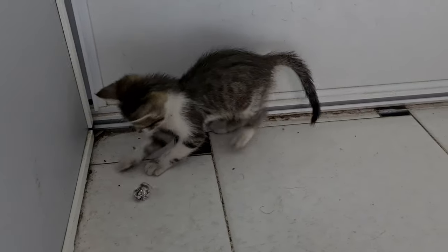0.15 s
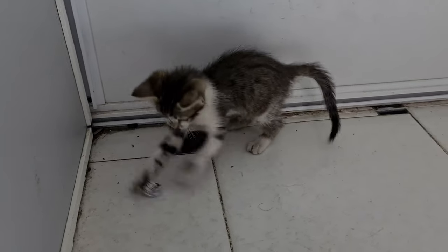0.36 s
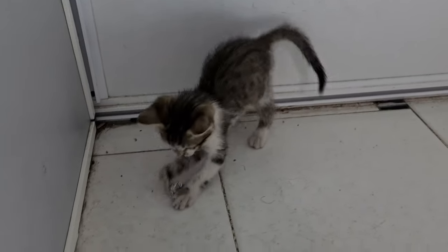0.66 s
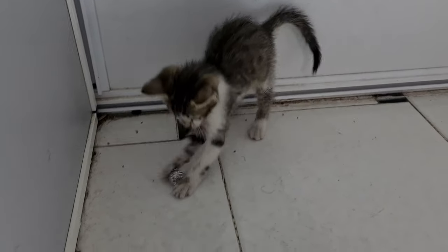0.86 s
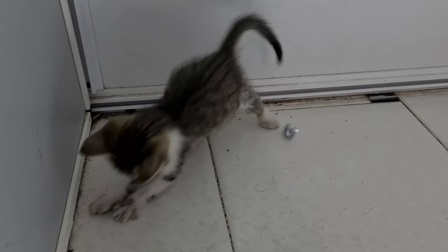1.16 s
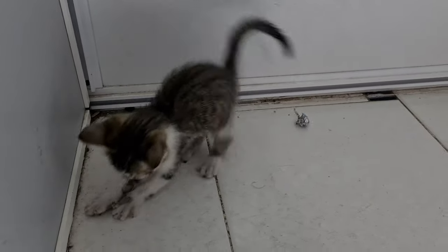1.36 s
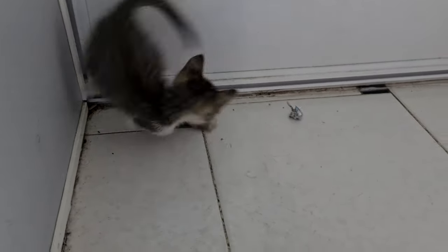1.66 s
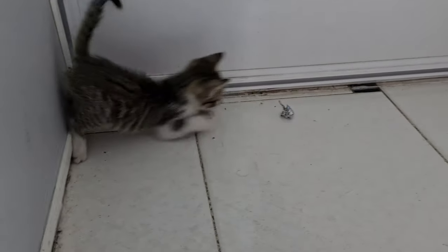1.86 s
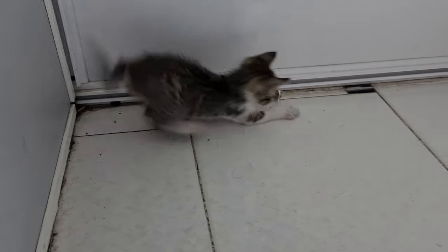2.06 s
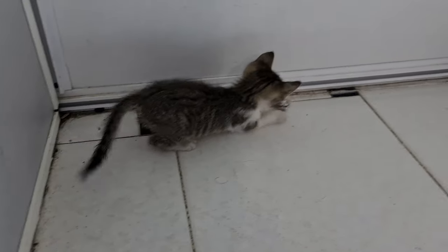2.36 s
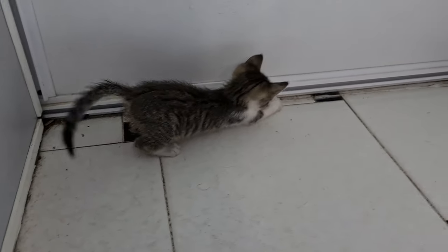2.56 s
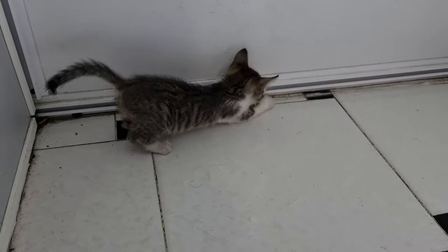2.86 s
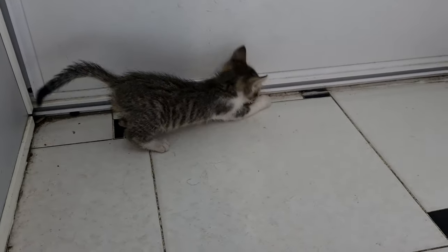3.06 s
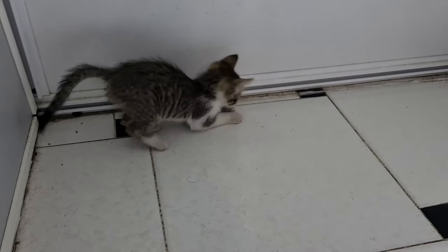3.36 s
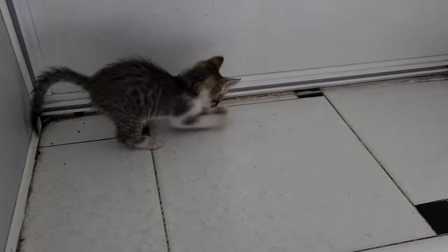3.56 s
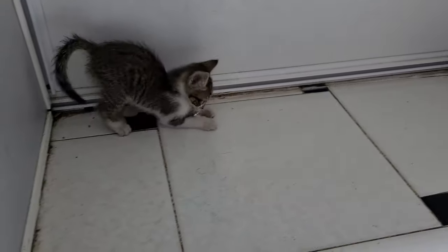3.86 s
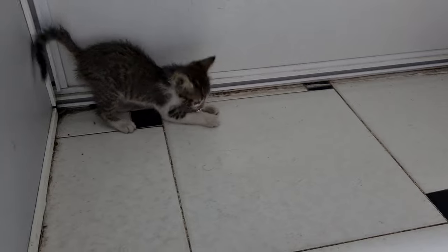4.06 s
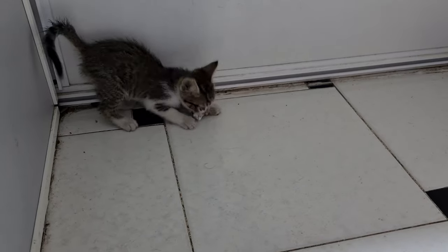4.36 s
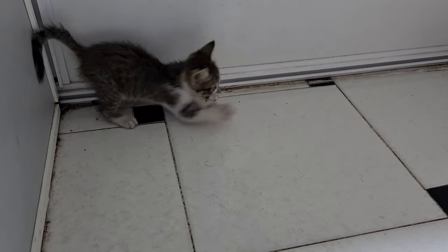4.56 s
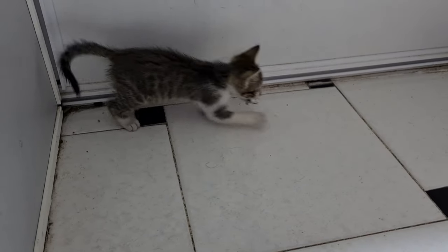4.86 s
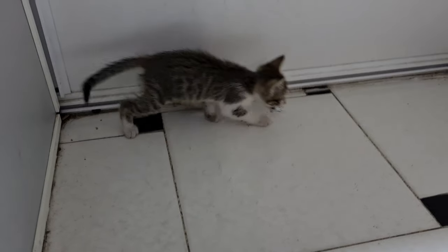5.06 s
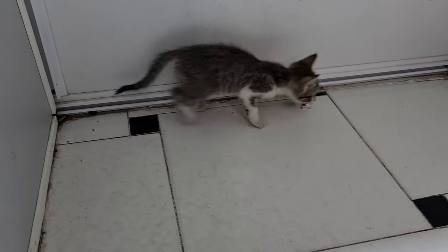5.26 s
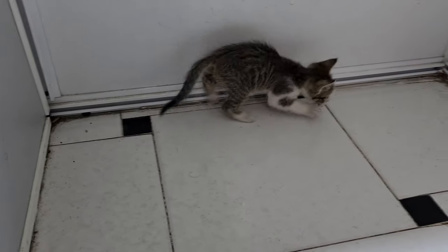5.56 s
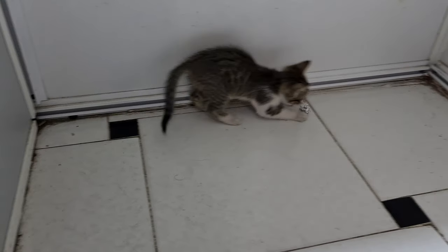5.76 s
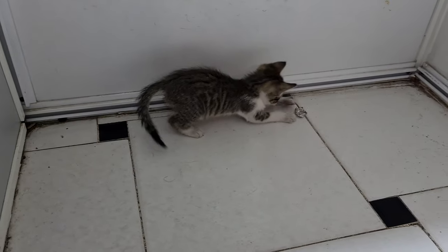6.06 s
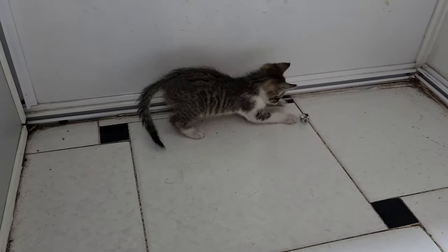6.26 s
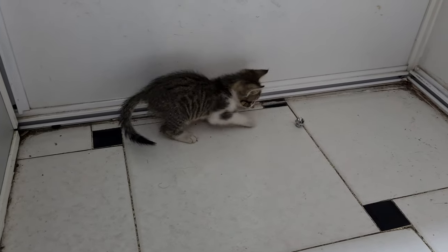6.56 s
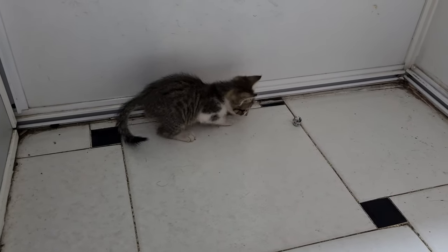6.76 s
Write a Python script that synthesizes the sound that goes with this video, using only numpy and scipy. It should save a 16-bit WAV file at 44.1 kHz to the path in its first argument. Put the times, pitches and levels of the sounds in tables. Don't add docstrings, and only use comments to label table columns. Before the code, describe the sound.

In a bare tiled corner, a kitten bats a crumpled foil ball: crisp ticks, crinkles and short scrapes in uneven bursts. Just before two seconds a hollow door is bumped with a quick rebound flutter, then brisk foil scrapes follow. Later come sparser ticks and small bright pings. Low vehicle engines drone and surge outside with tyre wash, gradually fading. Close stereo handheld microphone, short hard-walled echo.

```python
import sys
import numpy as np
from scipy import signal
from scipy.fft import rfft, irfft
from scipy.io import wavfile
from scipy.ndimage import uniform_filter1d

SR = 44100
rng = np.random.default_rng(int(sys.argv[2]) if len(sys.argv) > 2 else 0)


def log_audio(samples):
    frames = np.atleast_2d(samples).T
    limited = np.clip(frames, -1, 1)
    pcm = np.round(limited * 32767).astype(np.int16)
    wavfile.write(sys.argv[1], SR, pcm)


def volts_from_decibels(level):
    exponent = np.asarray(level, float) / 20
    return 10 ** exponent


N = 304712

# (frequency [Hz], likeness [-1 to 1])
LIKENESS = [(60, 0.98), (180, 0.94), (550, 0.62), (1650, -0.22), (4970, 0.13), (15000, 0.096)]


def evened(x):
    return x / np.sqrt(np.mean(x ** 2) + 1e-20)


def read(points, hz):
    f, value = np.transpose(points)
    return np.interp(np.log(hz + 1), np.log(f + 1), value)


def add(mix, s, sound):
    part = mix[..., round(s * SR):][..., :sound.shape[-1]]
    part += sound[..., :part.shape[-1]]


def unroll(rows):
    s, *columns = np.transpose(rows)
    t = np.arange(s[0], s[-1], 1 / SR)
    return [t] + [np.interp(t, s, c) for c in columns]


def resonate(x, hz, width):
    turn = np.exp(2j * np.pi * np.cumsum(hz * np.ones(x.shape[-1])) / SR)
    r = np.exp(-np.pi * width / SR)
    return 2 * (turn * signal.lfilter([1 - r], [1, -r], x / turn)).real


def crackle(size, spread_db):
    strength = np.minimum(rng.exponential(1, size // 24 + 1), 4.2)
    clumps = volts_from_decibels(spread_db * np.repeat(strength, 24)[:size])
    return evened(rng.standard_normal((2, size)) * uniform_filter1d(clumps, 12))


def road():
    # (time [s], level [dB])
    wash = [
        (0.0, -52.5),
        (1.67, -51),
        (2.25, -47.5),
        (3.04, -53),
        (4.389, -58),
        (5.75, -58.5),
        (6.331, -61),
        (6.91, -61.5),
    ]
    # (frequency [Hz], level per Hz [dB])
    near_colour = [(15, -47.5), (30, -28), (60, -6), (105, -10.5), (190, -28), (255, -18.5), (330, -29.5),
                   (550, -31.5), (850, -37), (1020, -33.5), (2050, -36.5), (2500, -47.5), (7000, -65),
                   (16000, -87.5)]
    # (frequency [Hz], level per Hz [dB])
    far_colour = [(15, -42), (30, -3.5), (102, -6), (125, -21.5), (195, -17), (416, -25), (520, -26.5),
                  (700, -36), (1290, -31.5), (2050, -40), (2400, -54), (4500, -57), (6500, -65.5),
                  (16000, -73.5)]
    rumble_share = 0.65
    pass_s, pass_db, pass_width_s = 4.25, 6, 0.37

    frames, hz = N // 512 + 5, np.fft.rfftfreq(2048, 1 / SR)
    a, b, c, d, patches = rng.standard_normal((frames, len(hz), 5)).T
    patches = evened(uniform_filter1d(uniform_filter1d(patches, 5, axis=0), 8, axis=1))
    t = np.arange(frames) * 512 / SR
    s, wash_db = np.transpose(wash)
    level_db = np.interp(t, s, wash_db)

    away = np.clip((t - 2.4) / 3.3, 0, 1)
    colour_db = (1 - away) * read(near_colour, hz)[:, None] + away * read(far_colour, hz)[:, None]
    middle = (hz > 350) & (hz < 2500)
    colour_db -= 10 * np.log10((volts_from_decibels(colour_db[middle]) ** 2).sum(0))

    bass = 1 / (1 + (hz[:, None] / 330) ** 4)
    steady = 1 / (1 + (8000 / (hz[:, None] + 1)) ** 4)
    passing_db = pass_db * np.exp(-((t - pass_s) / pass_width_s) ** 2) - 0.98
    swing_db = bass * ((rumble_share - 1) * (level_db - level_db.mean()) + passing_db)
    swing_db -= .4 * steady * (level_db - uniform_filter1d(level_db, 150))

    same = np.clip(read(LIKENESS, hz), -1, 1)[:, None]
    left = a + 1j * b
    right = same * left + np.sqrt(1 - same ** 2) * (c + 1j * d)
    z = np.array([left, right]) * volts_from_decibels(colour_db + level_db + swing_db + 2.08 * patches + 2.0)
    return signal.istft(z, nperseg=2048, noverlap=1536)[1][:, :N]


def drone(t, hz, gain):
    drift, flutter = (evened(uniform_filter1d(uniform_filter1d(v, 2000), 2000))[:len(t)]
                      for v in rng.standard_normal((2, N + SR)))
    tone = np.sqrt(2) * np.sin(2 * np.pi * np.cumsum(hz * (1 + 0.016 * drift)) / SR)
    return gain * volts_from_decibels(2.5 * flutter) * tone * signal.windows.tukey(len(t), .04)


def engines():
    # (time [s], pitch [Hz])
    truck_rate = [(0.0, 39.3), (.48, 45.9), (1.0, 51.08), (1.7, 55.6), (1.8, 53.88), (2.68, 54.2),
                  (2.95, 50.46), (3.54, 38.85), (3.85, 33.7)]
    boom_hz = [(0.0, 93.64), (.67, 89.3), (1.09, 95), (1.9, 98.9), (2.67, 99.4), (3.7, 94.5), (4.1, 88.8),
               (4.5, 96), (6.91, 94.97)]
    car_rate = [(3.8, 84.2), (3.99, 84.23), (4.1, 65.64), (4.89, 74.1), (5.33, 65.37), (5.44, 72.87),
                (6.11, 66.55), (6.57, 80.3), (6.91, 71.4)]
    # (time of top [s], level [dB], rise [s], fall [s])
    truck_swells = [(.31, -42, 0.083, 0.99), (.86, -33, 0.6, 0.058), (1.71, -33, 0.54, 0.034),
                    (1.8, -28.5, 0.028, 0.2), (2.15, -30, 0.062, 0.051), (2.68, -29.5, 0.52, 0.16),
                    (3.54, -29.5, 0.58, 0.37)]
    boom_swells = [(0.0, -20, .1, 0.054), (.3, -41.5, 1.7, 1.8), (1.09, -26, 0.26, 0.13),
                   (1.33, -28.5, .17, 0.96), (2.27, -37, 0.64, 0.22), (2.7, -41.5, 0.53, 1.6),
                   (3.7, -29, 0.21, 0.075), (3.89, -32, 0.23, 0.055), (4.06, -39, 0.18, 0.23),
                   (4.37, -43, 0.22, .2), (4.66, -45, 0.096, 0.28), (5.6, -47, 1.2, 0.17),
                   (6.08, -41, .12, 0.3), (6.72, -45, 0.18, 0.049)]
    car_swells = [(4.1, -36, 0.5, 0.78), (4.35, -38, 0.12, 0.39), (4.86, -38, 1.8, 0.034),
                  (5.44, -38, 0.24, 0.52), (6.11, -47, 0.17, .1), (6.57, -43.5, 0.059, 0.49)]
    # (time [s], firing rate [Hz], level [dB])
    far_engines = [
        [(3.9, 35.2, -47), (4.6, 36.5, -42), (4.78, 49.9, -56), (5.69, 48.6, -56), (5.88, 38, -53),
         (6.91, 37.98, -48)],
        [(5.1, 148.5, -66), (5.482, 144.4, -50), (6.792, 152.2, -64.5), (6.91, 156, -75)],
        [(1.8, 138.8, -41), (2.538, 126.1, -55.5), (2.6, 143, -63)],
    ]
    slope_db = -13.5

    out = np.zeros(N)
    for rows, swells in ((truck_rate, truck_swells), (boom_hz, boom_swells), (car_rate, car_swells)):
        t, hz = unroll(rows)
        power = 0
        for top_s, db, rise, fall in swells:
            distance = np.maximum((top_s - t) / rise, (t - top_s) / fall)
            power = power + volts_from_decibels(db + slope_db * distance) ** 2
        add(out, t[0], drone(t, hz, np.sqrt(power)))
    for rows in far_engines:
        t, hz, db = unroll(rows)
        add(out, t[0], drone(t, hz, volts_from_decibels(db)))
    return out


def scrapes():
    # (start [s], hardest [s], end [s], pressure [dB], drag on the tile [dB])
    slide_list = [(0.0, 0.008, 0.021, -73, -12), (0.033, 0.06, .12, -63, -5), (0.122, 0.154, 0.2, -74, -12),
                  (0.621, 0.652, .685, -69.5, 2), (0.386, 0.446, 0.53, -54, -8),
                  (0.491, 0.501, 0.57, -55.5, 0.5), (0.539, 0.567, .61, -63, -6.5),
                  (0.671, 0.711, 0.78, -60, -2), (0.879, 0.908, 1.07, -68, -1.5),
                  (1.125, 1.151, 1.4, -67.5, 3), (1.762, 1.765, 1.87, -57, 3.5),
                  (1.995, 2.017, 2.036, -57.5, -5.5), (2.051, 2.061, 2.15, -55.5, 4),
                  (2.148, 2.164, 2.214, -51.5, -3), (3.173, 3.205, 3.28, -70, 11),
                  (3.258, 3.322, 3.42, -72.5, 12), (4.05, 4.088, 4.125, -79.5, -6),
                  (4.17, 4.22, 4.33, -78, 4.5), (4.314, 4.372, 4.435, -59.5, 0.7),
                  (4.768, 4.81, 4.87, -70.5, 3)]
    touch_db, lift_db = -12.5, -18.5
    bright_per_drag = -0.44

    parts = np.zeros((3, 2, N))
    for start, top, end, top_db, drag_db in slide_list:
        db = unroll([(start, top_db + touch_db), (top, top_db), (end, top_db + lift_db)])[1]
        rub = np.array([crackle(4 * 4096, 1.9)[:, :len(db)] for _ in range(3)])
        rub *= signal.windows.tukey(len(db), .3)
        part_db = np.array([drag_db, 0, bright_per_drag * drag_db - 3]) + 4.0
        add(parts, start, volts_from_decibels(part_db)[:, None, None] * volts_from_decibels(db) * rub)
    return parts


def touches():
    # (time [s], blow [dB], ringing facet [Hz], bright part [dB])
    flicks = [(.016, -44.5, 7100, -4), (.128, -46, 7750, -6), (.411, -48, 7620, -11),
              (.4594, -37, 6760, -23), (.5144, -44.5, 7090, -10.5), (1.0255, -34.5, 5900, 2),
              (1.158, -48, 5950, -17), (2.0198, -45, 11440, -11), (2.0688, -43.5, 6950, -6.5),
              (2.161, -37.5, 10490, 0.5), (3.2215, -39.5, 6100, -7), (3.562, -55.5, 5935, -8),
              (3.626, -66, 3640, 3.5), (3.6425, -40, 7800, -3.5), (3.702, -60, 3570, 0),
              (5.4859, -65.5, 6815, -0.5), (5.805, -43, 11700, 2.5), (5.8426, -48, 6950, 2.3),
              (5.8634, -75, 5815, -4.5), (5.9895, -59.5, 6810, 0), (6.158, -53.5, 10430, 3),
              (6.372, -56.5, 11700, -7.5), (6.39, -51.5, 6140, 1.5)]
    # (time [s], blow [dB], ringing facet [Hz], bright part [dB])
    pats = [(.036, -43, 3900, -8), (.394, -52.5, 4300, -8), (.62, -52, 11200, -4.5), (.677, -57, 3820, -1),
            (.707, -48, 6050, -12.5), (.816, -54.5, 3580, -21), (.885, -49.5, 7330, -11),
            (1.3164, -51, 4460, -19), (1.6706, -58.5, 5960, -3), (1.689, -66.5, 5270, -28),
            (1.767, -49.5, 4050, -5), (2.0567, -39, 5860, -15), (3.264, -58, 5370, 5),
            (3.353, -51.5, 7000, -6.5), (3.5548, -56, 3468, -16.5), (3.797, -54.5, 4910, -24),
            (4.0537, -62.5, 3570, -19), (4.362, -48.5, 6060, -9), (4.4655, -64.5, 3980, -1),
            (5.654, -59.5, 6900, -19), (6.0076, -57.5, 7274, -6.5), (6.343, -57, 11700, -5)]
    # (time [s], blow [dB], ringing facet [Hz], bright part [dB])
    landings = [(.9964, -53.5, 3990, -1.5), (1.0844, -51, 3530, 0), (1.115, -47.5, 6460, 1.5),
                (1.26, -51, 5890, -13), (1.4545, -57, 4814, -23.5), (1.717, -54.5, 5220, -25.5),
                (1.7317, -42.5, 3570, -20), (1.917, -57, 5820, -22), (2.0045, -43.5, 6280, -6.5),
                (2.1274, -51.5, 5700, -4.5), (2.2385, -43.5, 11800, 0.5), (2.303, -49.5, 7200, -4),
                (2.4903, -59, 6142, -3.5), (2.9607, -63, 9930, -3.5), (2.9938, -53.5, 7100, 0.5),
                (3.0586, -54.5, 4280, -5.5), (3.081, -46.5, 13080, -7), (3.0896, -51, 3500, -8.5),
                (3.183, -52, 4260, -24), (3.2894, -55, 5750, -16.5), (4.446, -59.5, 3940, -10),
                (5.5618, -66.5, 3890, 0.5), (5.573, -56, 3800, -5), (5.6406, -56, 3720, -23),
                (5.722, -58, 6330, -5), (5.772, -69.5, 11700, 5), (6.209, -67.5, 5080, -6)]
    kinds = (flicks, -17, 0.0011, 0.0058), (pats, -2, .0022, 0.0077), (landings, 1.9, .003, 0.009)
    light_db = -89

    parts, rings = np.zeros((3, 2, N)), np.zeros((2, N))
    t = np.arange(2048) / SR
    for blows, dull_db, fold_s, settle_s in kinds:
        for s, db, hz, bright_db in blows:
            settle = max(settle_s * (2 + (db + 41.5) / (light_db + 38.5)), .002)
            crush = (1 - np.exp(-t / fold_s)) * np.exp(-(t / settle) ** 1.27)
            snaps = np.array([crackle(len(t), 4.05) for _ in range(3)]) * crush
            part_db = db - 9.5 + np.array([dull_db, 0, bright_db])
            add(parts, s - .001, volts_from_decibels(part_db)[:, None, None] * snaps)
            add(rings, s - .001, volts_from_decibels(db - 1.5) * resonate(snaps[1], hz, 600))
    return parts, rings


def fur():
    # (start [s], length [s], first pitch [Hz], last pitch [Hz], level [dB])
    strokes = [
        (1.437, 0.1, 4800, 4800, -65.5),
        (1.655, 0.14, 6140, 3984, -61),
        (0.51, .5, 610, 560, -57),
        (5.52, .3, 479.7, 429.8, -56),
        (5.557, .24, 770, 805, -62.5),
        (6.679, 0.051, 5600, 5100, -79),
    ]
    out = np.zeros((2, N))
    for start, length, first_hz, last_hz, db in strokes:
        u = np.arange(0, length, 1 / SR) / length
        hz = first_hz + (last_hz - first_hz) * u
        rub = crackle(6 * 4096, 1.2)[:, :len(u)]
        stroke = volts_from_decibels(db - 10 * (2 * u - 1) ** 2)
        hollow = resonate(resonate(rub, hz, 0.21 * hz[0]), hz, 0.21 * hz[0])
        add(out, start, stroke * evened(hollow))
    return out


def door():
    # (time [s], blow [dB])
    bump_list = [
        (1.7263, -9.5),
        (1.7333, -15.5),
        (1.761, -15),
        (1.7756, -17),
        (1.788, -23),
        (1.803, -29),
        (1.823, -35),
    ]
    # (frequency [Hz], level [dB], time to fall 60 dB [s])
    door_tones = [(121.6, -10.5, 0.1), (172.5, -12.5, 0.14), (249, -0.5, 0.063), (367, -6.5, 0.047),
                  (451, -8.5, 0.044), (679, -10, 0.032), (784, -11.5, 0.018), (1035, -8, 0.017),
                  (1290, -27, 0.029), (3410, -28.5, 0.017)]
    out, t = np.zeros(N), np.arange(9000) / SR
    for (s, blow_db), luck in zip(bump_list, rng.standard_normal((len(bump_list), len(door_tones), 2))):
        ring = 0
        for (hz, db, t60), (strength, shift) in zip(door_tones, luck):
            fade = volts_from_decibels(db + hz / 400 * np.tanh(strength) - 60 * t / t60)
            shifted_hz = hz * (1 + hz / 15000 * np.tanh(shift))
            ring = ring + fade * np.sin(2 * np.pi * shifted_hz * t)
        add(out, s, -volts_from_decibels(blow_db) * ring * (1 - np.exp(-t / 0.0014)))
    return np.array([out, np.roll(out, 12)])


def pings():
    # (time [s], pitch [Hz], level [dB], time to fall 60 dB [s])
    ping_list = [
        (3.187, 4200, -53, .03),
        (3.564, 5930, -54, 0.048),
        (3.794, 4900, -64.5, 0.046),
        (4.448, 3840, -46, 0.018),
        (5.575, 3850, -47, 0.019),
        (5.758, 5000, -70.5, 0.044),
        (5.761, 2860, -58, .015),
        (5.808, 5200, -60, 0.028),
    ]
    out = np.zeros((2, N))
    t = np.arange(2048) / SR
    for s, hz, db, t60 in ping_list:
        rattle = evened(resonate(rng.standard_normal((2, len(t))), hz, 120))
        add(out, s, volts_from_decibels(db - 60 * t / t60) * (1 - np.exp(-t / 0.00092)) * rattle)
    return out


def turning(x):
    z = signal.stft(x, nperseg=256, noverlap=192)[2]
    patches = uniform_filter1d(rng.standard_normal(z.shape[1:]), size=4, axis=0)
    patches = uniform_filter1d(patches, size=14, axis=1)
    z = z * volts_from_decibels(2.5 * evened(patches) - 2.5)
    return signal.istft(z, nperseg=256, noverlap=192)[1][:, :N]


def ball():
    # (frequency [Hz], level per Hz [dB])
    foil_colour = [(2000, 10.5), (3000, -3.5), (4400, -1), (5900, 6), (7000, 5.5), (8800, 2), (11600, -9.5),
                   (16000, -17)]
    parts, rings = touches()
    parts += scrapes()
    hz = np.fft.rfftfreq(N, 1 / SR)
    low, high = (1 / (1 + (edge_hz / (hz + 1)) ** 12) for edge_hz in (4900, 9000))
    bands = np.array([1 - low, low - high, high])
    shapes = volts_from_decibels(read(foil_colour, hz)) * bands / (1 + (2300 / (hz + 1)) ** 6)
    shapes /= np.sqrt((shapes ** 2).mean(1, keepdims=True))
    crinkle = irfft((rfft(parts) * shapes[:, None]).sum(0), N)
    return turning(crinkle) + rings + pings()


def corner(x, wet_db):
    # (frequency [Hz], time to fall 60 dB [s])
    echo_length = [(100, 0.72), (500, 0.068), (2000, 0.41), (6000, 0.19), (12000, 0.11)]
    taps = np.zeros((2, SR // 2))
    at = np.arange(80, SR // 2 - 20, 20) + rng.integers(0, 20, (2, (SR // 2 - 81) // 20))
    np.put_along_axis(taps, at, rng.choice([-1., 1.], at.shape), 1)
    hz, t, z = signal.stft(taps, SR, nperseg=256)
    same = np.clip(read(LIKENESS, hz), 0, 1)[:, None]
    z[1] = same * z[0] + np.sqrt(1 - same ** 2) * z[1]
    fade = volts_from_decibels(-60 * t / read(echo_length, hz)[:, None])
    tail = signal.istft(z * fade, SR, nperseg=256)[1]
    echoes = signal.fftconvolve(x, tail / np.linalg.norm(tail[0]), axes=1)[:, :N]
    return x + volts_from_decibels(wet_db) * echoes


def scene():
    return corner(ball() + fur(), -7.5) + corner(door(), -7.0) + road() + engines()


def roll_off(x):
    return signal.sosfilt(signal.butter(12, 16640, fs=SR, output="sos"), x)


def record(dry):
    # (frequency [Hz], level [dB])
    port_colour = [(3000, -0.5), (6000, -1), (8100, -1), (8700, -3.5), (9600, -2), (10800, 3), (12000, 8),
                   (13200, 6), (15500, 11)]
    # (frequency [Hz], left minus right [dB])
    port_lean = [(60, 0.5), (180, -0.5), (550, -1.0), (1650, -3), (4970, -0.5), (15000, 1)]
    hz = np.fft.rfftfreq(N, 1 / SR)
    ports_db = read(port_colour, hz) + np.array([[.5], [-.5]]) * read(port_lean, hz)
    ports = volts_from_decibels(ports_db) * (hz < 15760)
    return roll_off(irfft(rfft(dry) * ports, N))


dry = scene()
out = record(dry)
log_audio(out)
```